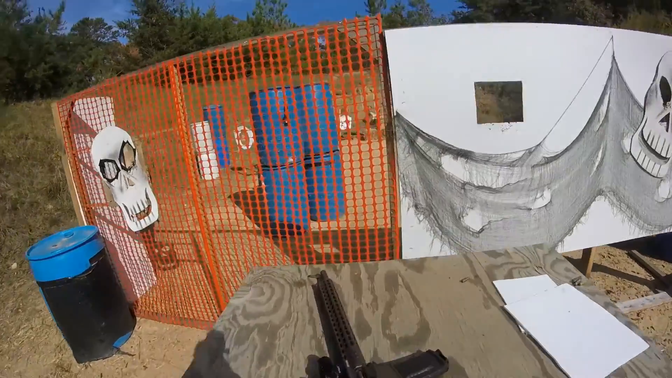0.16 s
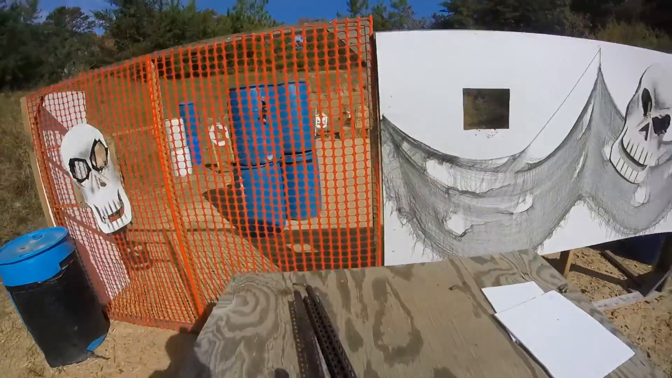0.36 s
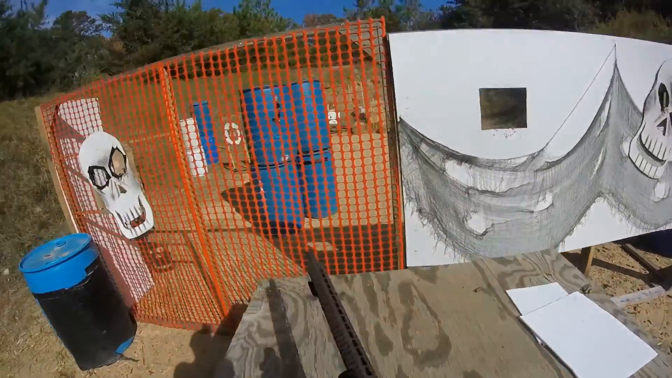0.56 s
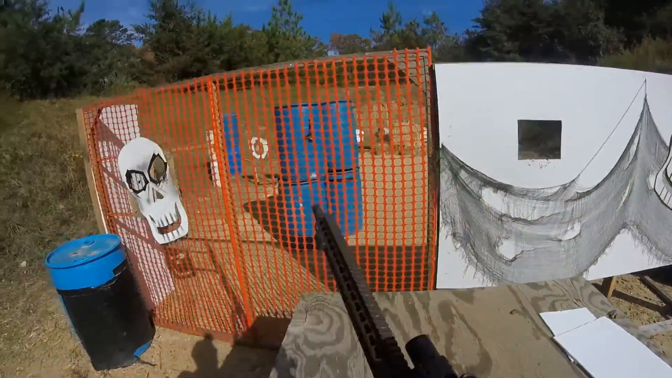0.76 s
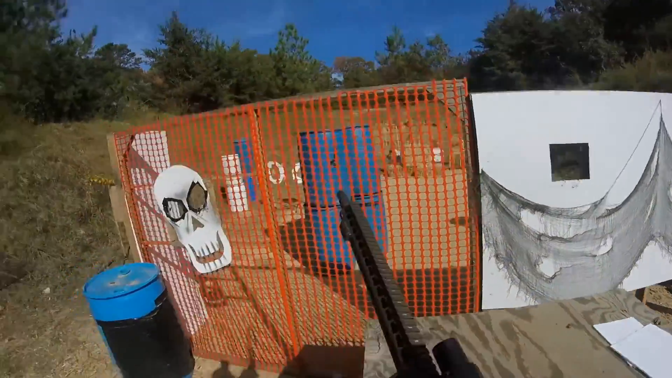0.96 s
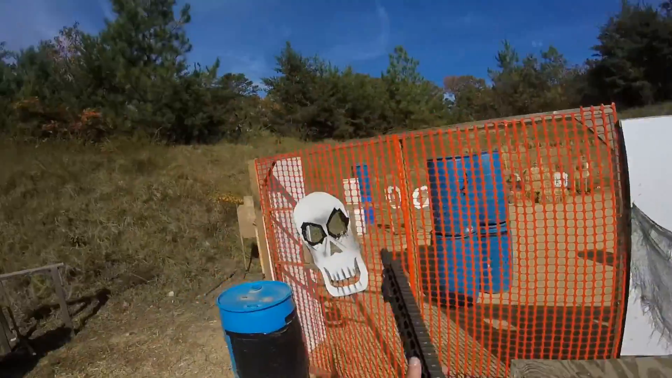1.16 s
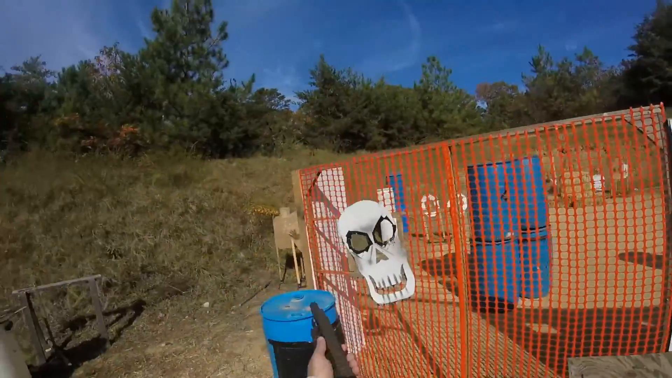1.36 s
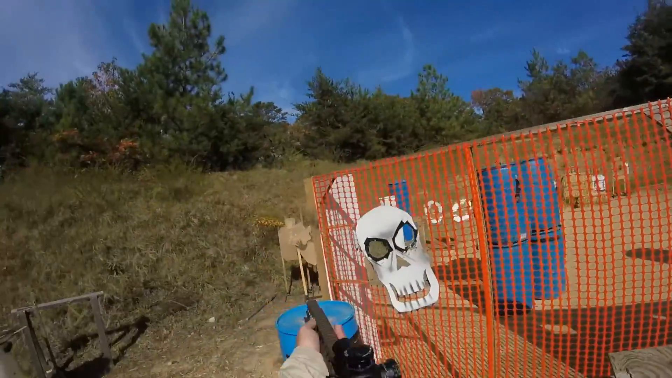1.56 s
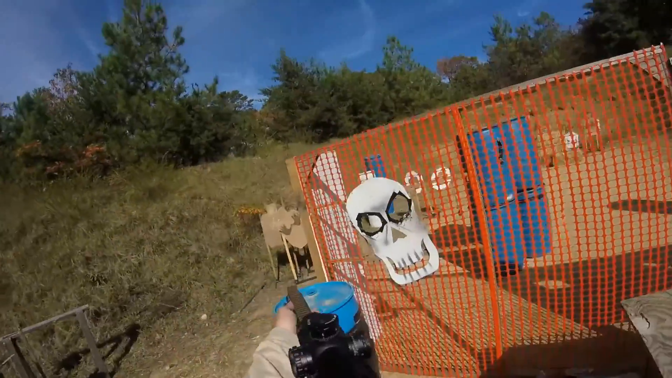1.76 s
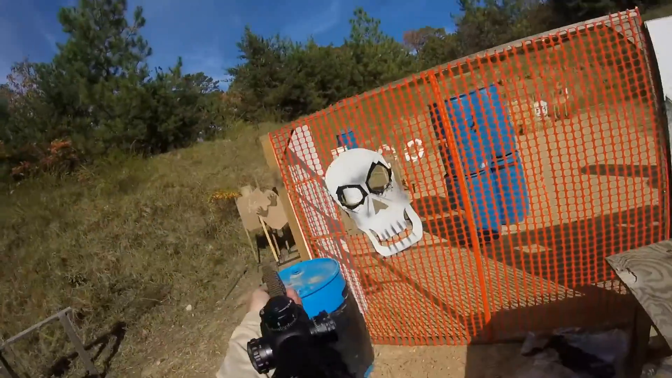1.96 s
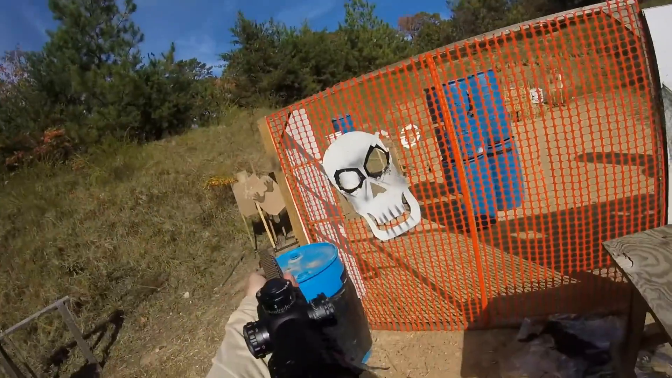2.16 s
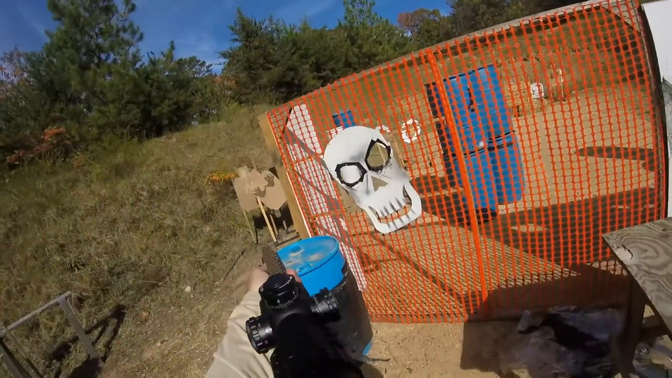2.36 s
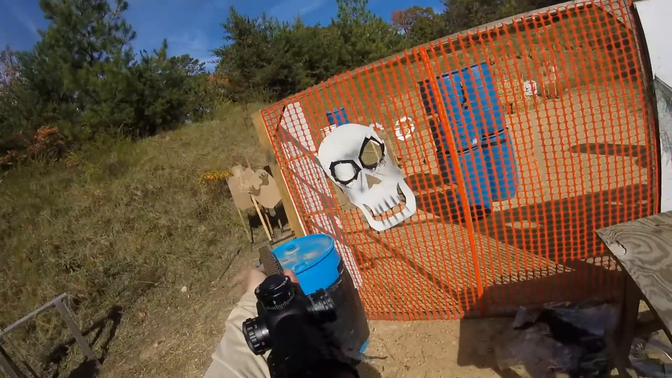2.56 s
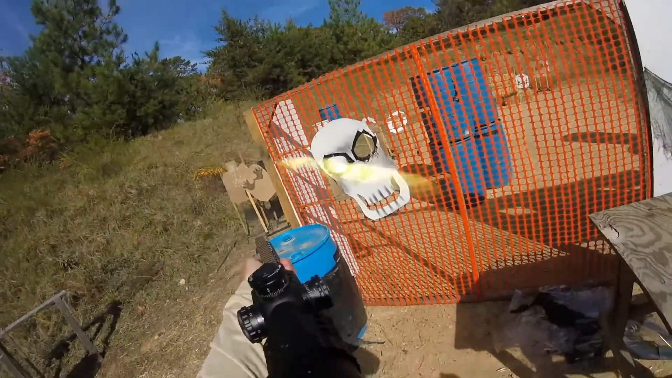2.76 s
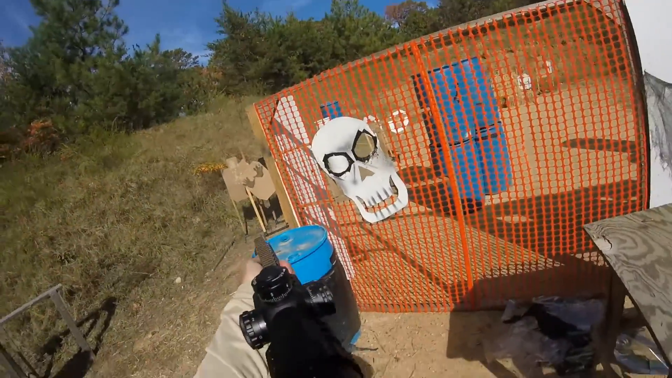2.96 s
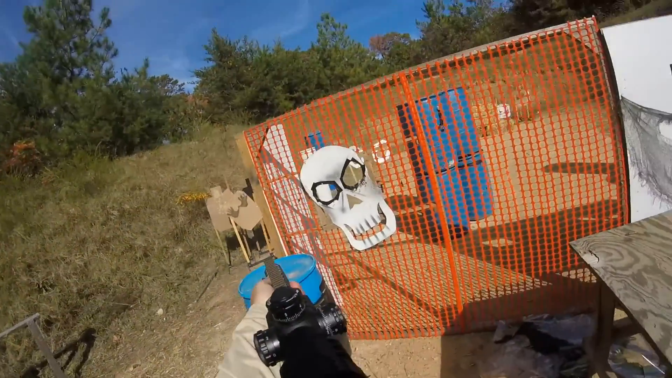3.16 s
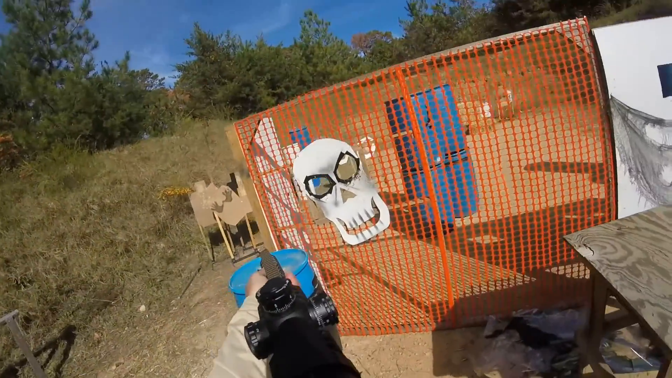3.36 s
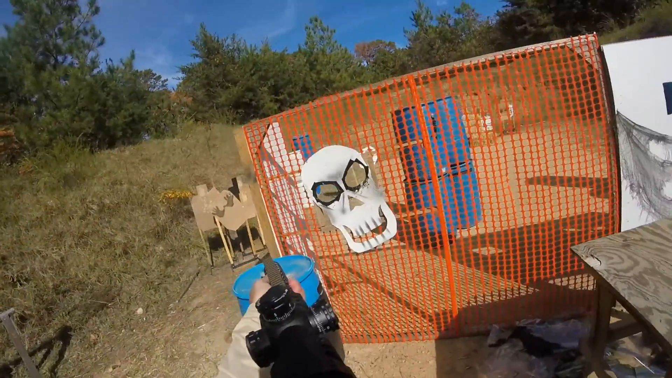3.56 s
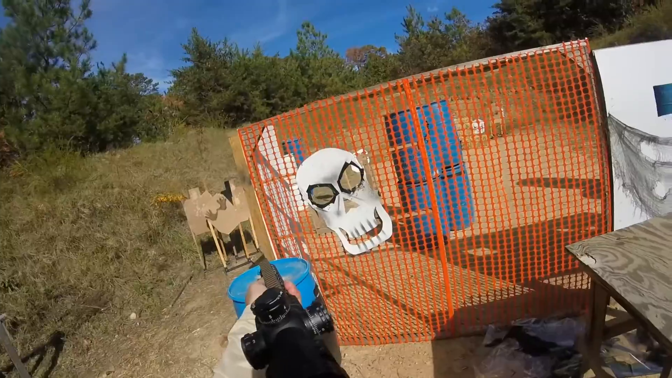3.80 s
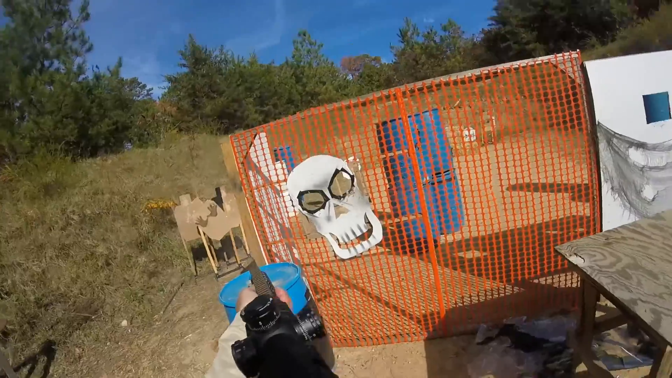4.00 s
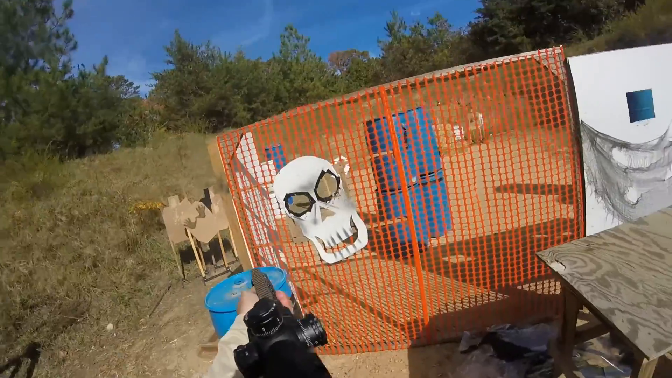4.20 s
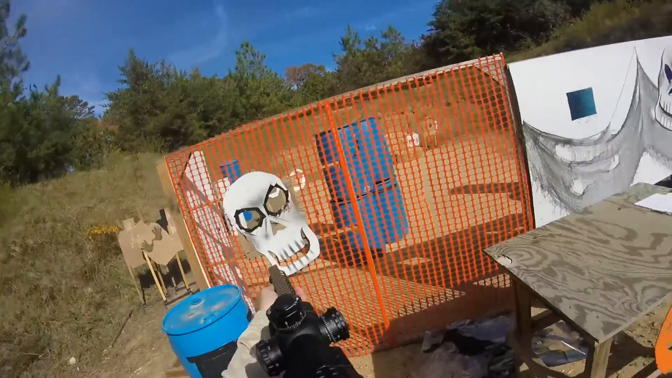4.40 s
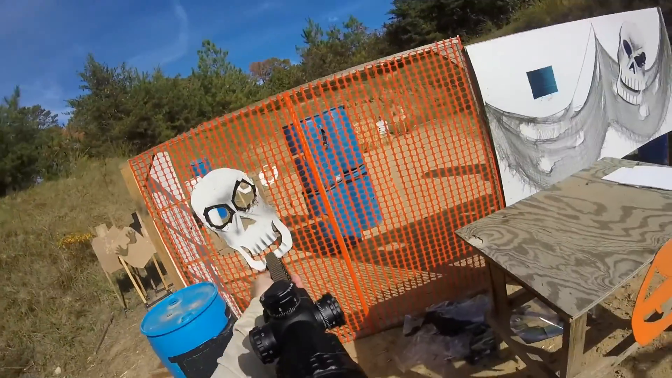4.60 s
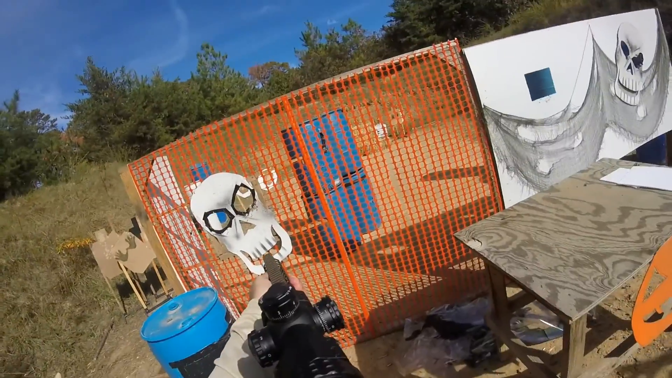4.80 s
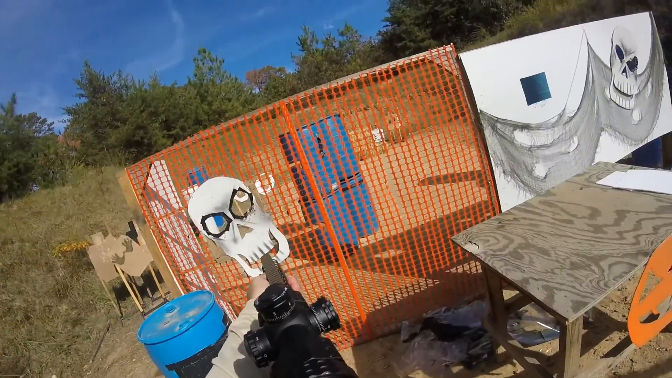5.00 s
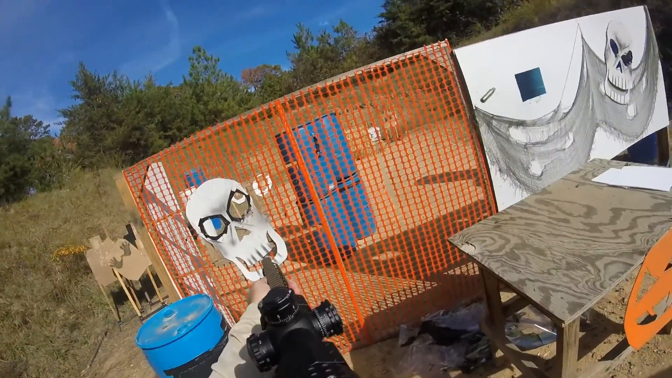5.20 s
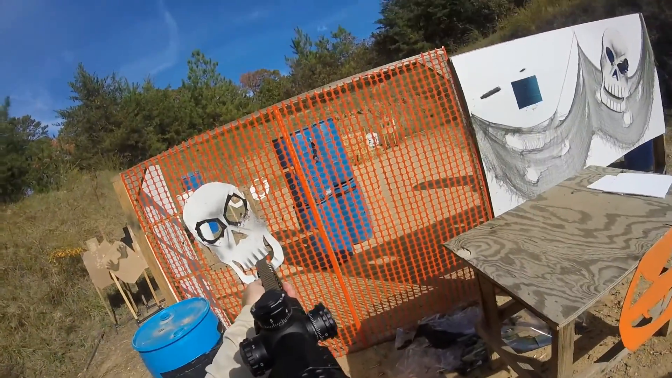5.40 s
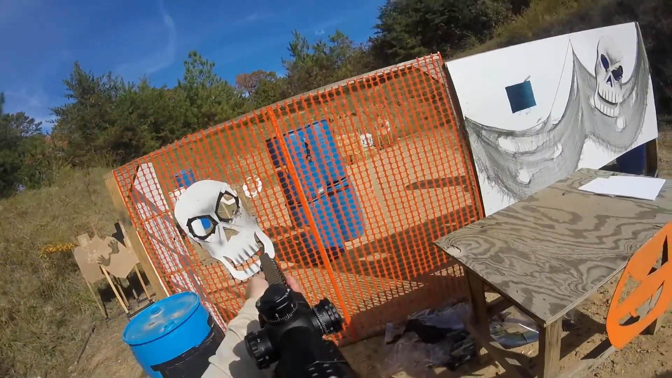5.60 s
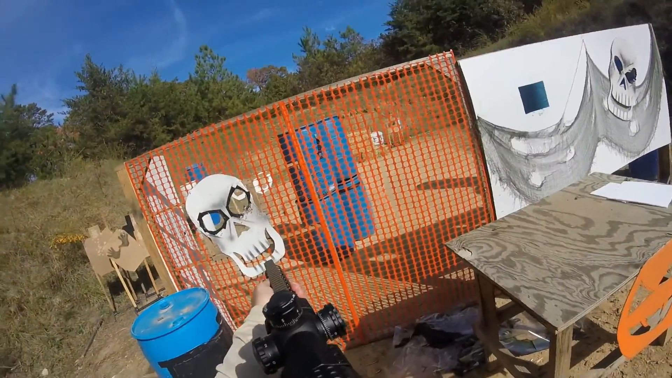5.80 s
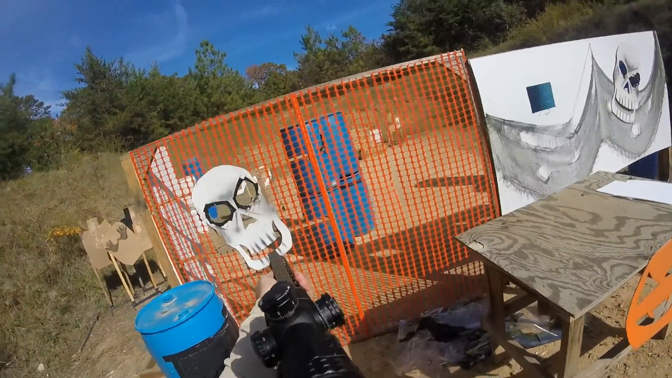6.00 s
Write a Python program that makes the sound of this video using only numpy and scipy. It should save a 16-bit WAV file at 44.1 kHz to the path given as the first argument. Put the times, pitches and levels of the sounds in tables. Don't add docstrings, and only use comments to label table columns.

```python
import sys
import numpy as np
from scipy import signal
from scipy.fft import rfft, irfft, next_fast_len
from scipy.io import wavfile
from scipy.ndimage import uniform_filter1d

SR = 44100
rng = np.random.default_rng(int(sys.argv[2]) if len(sys.argv) > 2 else 0)


def wav_out(sig):
    wavfile.write(sys.argv[1], SR, np.round(np.clip(np.atleast_2d(sig).T, -1, 1) * 32767).astype(np.int16))


def volts_from_decibels(level):
    exponent = np.asarray(level, float) / 20
    return 10 ** exponent


N = 266805

# start_s, blast_db, echo_db, limiter_lag_ms, push_db
SHOTS = [
    (2.6536, 13.5, -36.5, -0.4, -4),
    (2.8275, 13.5, -36, -0.4, -9.5),
    (3.8959, 12, -36.5, 0.6, -12.5),
    (4.0626, 10.5, -38.5, -0.6, -3.5),
    (5.147, 11, -36, -0.2, -12),
    (5.3296, 12.5, -38.5, -0.5, -9.5),
]
# delay_ms, level_db, length_ms
ARRIVALS = [
    (0, 2.5, 0.49),
    (1.306, -0.5, 0.33),
    (2.702, -5.5, 0.51),
    (7.07, -3, .3),
    (11.78, -9.5, 0.27),
    (18.65, -12, .35),
    (28, -14.5, .4),
]
# freq_hz, level_db
ROAR_TONE = [(700, -13.5), (1550, 5.5), (2500, -7.5), (3750, 1.5), (4600, -15.5), (6500, -10.5), (8500, -8),
             (11000, -24), (15000, -30.5)]
# freq_hz, level_db, t60_s
THUMP_MODES = [(740, 1.5, .02), (1020, 0, .014)]
# start_s, level_db
CLACKS = [(2.701, -32), (2.8759, -32), (3.943, -33.5), (4.1126, -33), (5.1991, -32.5), (5.3822, -32)]
# freq_hz, level_db, t60_s
BOLT_MODES = [(3750, 0, .045), (6100, -9, .03), (7700, -11, .025), (9000, -16, .02)]
# walls_db, walls_fall_db_per_s, trees_s, swell_db_per_decade, spread_db_per_decade, loss_db_per_s
NEAR_FIELD = (17, 480, 0.13, 3.5, 21, 1.4)
FAR_FIELD = (3, 447, 0.083, 16.5, 25, 10)
# freq_hz, slope_db_per_s
AIR_LOSS = [(200, -19), (600, -4), (1500, -9), (3000, -13), (6000, -31.5), (10000, -39.5), (15000, -73.5)]
# start_s, bang_db, echo_db
FAR_SHOTS = [
    (1.3157, -15, -26),
    (2.9826, -32.5, -42),
    (5.878, -50, -77),
]
# delay_ms, level_db, length_ms
FAR_ARRIVALS = [(0, 13.5, 0.96), (1.84, 7.5, 0.58), (4.54, 9, 0.4), (6.26, 10.5, 0.81), (15.24, -4, 0.34),
                (85, -5, 0.76)]
# start_s, level_db, brightness_hz, t60_s
KNOCKS = [(0.489, -46, 2000, 0.033), (0.838, -45.5, 9000, 0.026), (1.216, -47.5, 3000, 0.065),
          (1.595, -43.5, 15000, 0.032), (3.608, -59, 3000, 0.022), (4.439, -59, 15000, 0.033),
          (4.465, -55, 15000, .03), (4.9859, -37.5, 497, 0.058), (4.992, -50, 9000, 0.042)]
# start_s, level_db, pitch_hz, t60_s
PINGS = [(5.011, -70, 10600, .2), (4.995, -78, 15000, .2), (3.61, -76, 15000, .15), (1.085, -66, 6700, .25)]
# start_s, length_s, level_db, start_hz, end_hz
WHISTLES = [(2.47, .07, -63, 2880, 2920), (2.51, .12, -59, 1630, 1635)]
# time_s, level_db
WIND = [(0, -31.5), (.5, -33.5), (.86, -36.5), (1.26, -35), (1.7, -30), (2.05, -29), (2.4, -38.5),
        (2.62, -34), (3.2, -39), (3.6, -37.5), (4.0, -38), (4.5, -42), (4.9, -42), (5.05, -34),
        (5.4, -45.5), (5.7, -41), (6.05, -38)]
# centre_s, level_db, length_s
PUFFS = [(.002, -46.5, 0.013), (0.145, -52.5, 0.012), (0.233, -51, .03), (0.321, -53, 0.05),
         (.405, -52, 0.021), (0.476, -53, 0.033), (0.592, -51, 0.026), (0.657, -55, 0.023),
         (0.71, -53, 0.011), (0.881, -55.5, 0.032), (1.071, -59, 0.013), (1.118, -72, .012),
         (1.228, -55.5, 0.012), (1.686, -51.5, .03), (1.757, -48.5, 0.037), (1.876, -60, 0.038),
         (1.96, -52.5, 0.027), (2.012, -47, 0.027), (2.133, -51.5, 0.015), (2.222, -49.5, 0.024),
         (2.319, -56.5, 0.027), (3.477, -64, 0.034), (3.604, -57, 0.038), (3.73, -65, 0.026),
         (4.77, -67, 0.017), (4.893, -68, 0.019), (5.042, -62, 0.023), (5.82, -63.5, .02),
         (6.0, -58, 0.041)]
# freq_hz, level_db_per_hz
RUMBLE_TONE = [(7.1, -39), (12, 6.5), (22, 2), (36, -8.5), (52, -8), (75, -30), (151, -35), (220, -36.5),
               (290, -71), (480, -120)]
# freq_hz, level_db_per_hz
RUSTLE_TONE = [(260, -30.5), (450, -3), (979, -7), (1420, -7), (1530, 3), (1680, -2), (2830, -1),
               (3190, -9), (4050, -11.5), (4910, -23), (8290, -25), (14400, -40.5), (16000, -40.5)]
# freq_hz, level_db_per_hz
FLOOR_TONE = [(53, -33), (90, -5.5), (209, -23), (288, -16), (653, -19.5), (1050, -26), (1550, -19),
              (1920, -27.5), (2890, -28.5), (4350, -34), (7500, -36.5), (12500, -44), (15800, -62)]
# freq_hz, width_hz, level_db
SHELL_MODES = [(720, 100, -23.5), (1548, 255, -3), (1549, 81, -3.5), (2370, 500, -15), (2907, 250, -10.5),
               (3814, 320, -11.5), (6190, 450, -18.5), (7800, 600, -24.5), (8800, 900, -26.5)]
# freq_hz, level_db
SHELL_LEAK = [(30, -13.5), (260, -31.5), (650, -22), (1100, -22), (2000, -15.5), (3400, -14.5), (4400, -28),
              (5300, -23), (8000, -32), (11000, -35), (14500, -44.5), (17000, -55.5)]
CONVERTER_TONE = [(20, 0), (8000, 0), (11000, -3.5), (14000, -7.5), (15200, -12), (16300, -45)]

ROAR_DB, ROAR_RISE_DB_PER_MS, ROAR_HOLD_MS, ROAR_FALL_DB_PER_MS = -3.5, 19.5, 2.1, 10
BOUNCE_MS, BOUNCE_DB, BOUNCE_FALL_DB_PER_MS = 7.2, -15, 3.5
OPEN_DB, CLAMP_AFTER_MS, CLAMP_DB_PER_MS = -6, 4.4, 4.5
CLAMP_DB, LET_GO_DB_PER_MS, LET_GO_MAX_DB = -21, 0.18, -15
BOLT_DB = 1
BOOM_DB, BOOM_HZ = 9, 380
DUCK_DB, RECOVER_S = 4.5, 0.78
LUMPS_DB, LUMP_S = 3, 0.03
STEADY_DB, FOLLOW = -60, 0.7
THRUM_DB, THRUM_SLOPE = -55.5, 1.2
FLOOR_DB = -60
LEAD_S = 0.003


def rifle():
    out, gas = np.zeros(N), coloured(ROAR_TONE)
    t = np.arange(round(0.15 * SR)) / SR - LEAD_S
    for s, blast_db, echo_db, lag_ms, push_db in SHOTS:
        blast = volts_from_decibels(blast_db) * muzzle_blast(t) * limiter_gain(t * 1000 - lag_ms)
        roar = roar_gain(t * 1000) * gas[round(s * SR):][:len(t)]
        add(out, s - LEAD_S, blast + roar + volts_from_decibels(push_db) * membrane_push(t))
        add(out, s - 0.0003, shell_thump(t + LEAD_S))
        add(out, s, volts_from_decibels(echo_db) * echoes(NEAR_FIELD, grain_db=1.0))
    for s, db in CLACKS:
        add(out, s, volts_from_decibels(db + BOLT_DB) * bolt(t + LEAD_S))
    return out


def muzzle_blast(t):
    return housing(uniform_filter1d(fronts(ARRIVALS, t, spread_db=3.5), size=7))


def fronts(arrivals, t, spread_db):
    out = np.zeros(len(t))
    for delay_ms, db, length_ms in arrivals:
        level_jitter, delay_jitter = rng.standard_normal(2)
        delay_s = delay_ms / 1000 * (1 + 0.0044 * delay_jitter)
        out += volts_from_decibels(db + spread_db * level_jitter) * wave(t - delay_s, length_ms / 1000)
    return out


def wave(t, length_s):
    u = np.maximum(t / length_s, 0)
    return -(1 - u) * np.exp(-u) * (t >= 0)


def limiter_gain(ms):
    late = np.maximum(ms - CLAMP_AFTER_MS, 0)
    clamping_db = OPEN_DB - CLAMP_DB_PER_MS * late
    releasing_db = np.minimum(CLAMP_DB + LET_GO_DB_PER_MS * late, LET_GO_MAX_DB)
    return volts_from_decibels(np.maximum(clamping_db, releasing_db))


def roar_gain(ms):
    rise_db = np.minimum(ROAR_RISE_DB_PER_MS * ms, 0)
    jet_db = np.minimum(rise_db, ROAR_FALL_DB_PER_MS * (ROAR_HOLD_MS - ms))
    late = ms - BOUNCE_MS
    bounce_db = np.minimum(ROAR_RISE_DB_PER_MS * late, -BOUNCE_FALL_DB_PER_MS * late)
    return volts_from_decibels(ROAR_DB + jet_db) + volts_from_decibels(BOUNCE_DB + bounce_db)


def membrane_push(t):
    shove = -np.sin(np.pi * np.clip(t / 0.0058, 0, 1)) ** 2
    onset = np.clip((t - 0.0045) / 0.0054, 0, 1)
    return shove + 0.26 * np.exp(-np.maximum(t - 0.008, 0) / 0.0041) * onset


def shell_thump(t):
    modes = [(hz * rng.uniform(0.88, 1.12), db - 2, t60 * 0.6) for hz, db, t60 in THUMP_MODES]
    return -ring(modes, t) * np.minimum(t / 0.001, 1)


def bolt(t):
    return ring(BOLT_MODES, t) * (1 - np.exp(-t / 0.00069))


def ring(modes, t):
    return sum(volts_from_decibels(db - 60 * t / t60) * np.sin(2 * np.pi * hz * t) for hz, db, t60 in modes)


def echoes(shape, grain_db):
    walls_db, fall_db, trees_s, swell_db, spread_db, loss_db = shape
    hz, t, z = signal.stft(rng.standard_normal(round(1.3 * SR)), SR, nperseg=256)
    hz = hz[:, None]
    tone_db = read(AIR_LOSS, hz) * t + BOOM_DB / (1 + (hz / BOOM_HZ) ** 4)
    field = signal.istft(z * volts_from_decibels(tone_db), SR, nperseg=256)[1]
    field *= flicker(grain_db, 0.0044, count=len(field))
    t = np.arange(1, len(field) + 1) / SR
    walls = volts_from_decibels(walls_db - fall_db * t)
    decades = np.log10(t / trees_s)
    trees = volts_from_decibels(np.minimum(swell_db * decades, -spread_db * decades) - loss_db * t)
    onset = np.minimum(t / 0.012, 1)
    fade = np.clip((t[-1] - t) / 0.3, 0, 1)
    return housing(field * np.hypot(walls, trees) * onset * fade)


def neighbour():
    out, t = np.zeros(N), np.arange(round(0.15 * SR)) / SR
    for s, bang_db, echo_db in FAR_SHOTS:
        bang = uniform_filter1d(fronts(FAR_ARRIVALS, t - 0.0002, spread_db=1), size=15)
        add(out, s, volts_from_decibels(bang_db) * housing(bang))
        add(out, s, volts_from_decibels(echo_db + 7.5) * echoes(FAR_FIELD, grain_db=1.46))
    return out


def knocks():
    out, t = np.zeros(N), np.arange(round(0.3 * SR)) / SR
    for s, db, hz, t60 in KNOCKS:
        pole = np.exp(-2 * np.pi * hz / SR)
        burst = np.diff(signal.lfilter([1], [1, -pole], rng.standard_normal(len(t) + 1)))
        decay = volts_from_decibels(-60 * t / max(t60, 0.005))
        add(out, s, volts_from_decibels(db) * evened(housing(burst)) * decay * np.minimum(t / 0.0036, 1))
    return out


def pings():
    out, t = np.zeros(N), np.arange(round(0.3 * SR)) / SR
    for s, db, hz, t60 in PINGS:
        tone = ring([(hz, db, t60)], t) * flicker(3, 0.004, count=len(t))
        add(out, s, tone * np.minimum(t / 0.004, 1))
    return out


def whistles():
    out = np.zeros(N)
    for s, length_s, db, start_hz, end_hz in WHISTLES:
        count = round(length_s * SR)
        hz = np.linspace(start_hz, end_hz, count) * flicker(0.13, 0.0065, count=count)
        tone = np.sin(2 * np.pi * np.cumsum(hz) / SR) * flicker(1.4, 0.006, count=count)
        add(out, s, volts_from_decibels(db) * tone * signal.windows.tukey(count, 0.4))
    return out


def wind():
    t = np.arange(N) / SR
    duck_db = np.zeros(N)
    for s, *_ in SHOTS:
        duck_db -= DUCK_DB * np.exp(-np.maximum(t - s, 0) / RECOVER_S) * (t > s)
    wind_db = np.interp(t, *np.transpose(WIND))
    puffs = sum(volts_from_decibels(db) * np.exp(-(2 * (t - s) / length_s) ** 2 / 2) for s, db, length_s in PUFFS)
    blow = np.hypot(puffs, volts_from_decibels(STEADY_DB + FOLLOW * (wind_db + 32.5) + duck_db))
    grain = flicker(1.8, 0.012)
    rustle = coloured(RUSTLE_TONE) * grain * blow
    hiss = volts_from_decibels(FLOOR_DB + duck_db) * coloured(FLOOR_TONE)
    return rumble(wind_db + duck_db) + rustle + thrum(grain, blow) + hiss


def rumble(level_db):
    noise = coloured(RUMBLE_TONE)
    noise /= np.sqrt(uniform_filter1d(noise ** 2, size=2600) + 0.45)
    return noise * volts_from_decibels(level_db) * flicker(LUMPS_DB, LUMP_S)


def thrum(grain, blow):
    tone = coloured([(180, -9.5), (250, 3.5), (300, 6), (360, -7.0), (480, -23)])
    return tone * grain * volts_from_decibels(THRUM_DB) * (blow / volts_from_decibels(-55)) ** THRUM_SLOPE


def housing(x):
    hz = abs(np.fft.fftfreq(8192, 1 / SR))
    power = volts_from_decibels(2 * read(SHELL_LEAK, hz))
    for mode_hz, width_hz, db in SHELL_MODES:
        power = power + volts_from_decibels(2 * db) / (1 + (2 * (hz - mode_hz) / width_hz) ** 2) ** 2
    log_gain = np.log(power) / 2
    taps = np.fft.ifft(np.exp(log_gain - 1j * signal.hilbert(log_gain).imag)).real[:4096]
    return signal.oaconvolve(x, taps / np.linalg.norm(taps))[:len(x)]


def coloured(points):
    size = next_fast_len(N)
    hz = np.fft.rfftfreq(size, 1 / SR)
    inside = (hz > points[0][0]) & (hz < points[-1][0])
    spectrum = rfft(rng.standard_normal(size)) * volts_from_decibels(read(points, hz)) * inside
    return evened(irfft(spectrum, size)[:N])


def flicker(depth_db, span_s, count=N):
    size = max(round(span_s * SR), 2)
    drift = uniform_filter1d(uniform_filter1d(rng.standard_normal(count), size), size)
    return volts_from_decibels(depth_db * evened(drift))


def evened(x):
    return x / np.sqrt(np.mean(x ** 2) + 1e-20)


def read(points, hz):
    f, value = np.transpose(points)
    return np.interp(np.log(hz + 1), np.log(f + 1), value)


def add(mix, s, sound):
    part = mix[round(s * SR):][:len(sound)]
    part += sound[:len(part)]


def scene():
    return (rifle() + neighbour() + knocks() + pings() + whistles() + wind())[None]


def band_limit(x):
    return signal.sosfilt(signal.butter(12, 16430, fs=SR, output="sos"), x)


def record(dry):
    knee = 7.0
    clipped = 0.97 * dry / (1 + abs(dry) ** knee) ** (1 / knee)
    hz = np.linspace(0, SR / 2, 129)
    taps = signal.firwin2(101, hz, volts_from_decibels(read(CONVERTER_TONE, hz)), fs=SR)
    limited = signal.oaconvolve(clipped, taps[None], "same")
    return band_limit(np.clip(limited, -1, 1))


dry = scene()
out = record(dry)
wav_out(out)
```